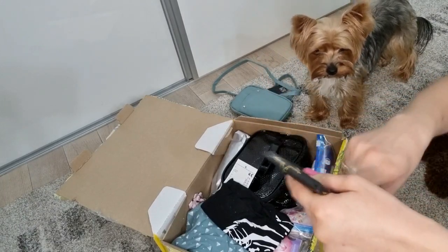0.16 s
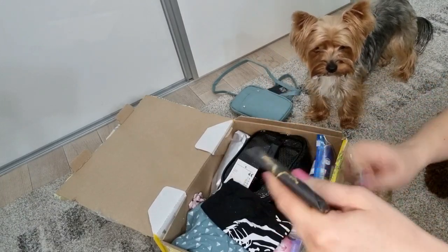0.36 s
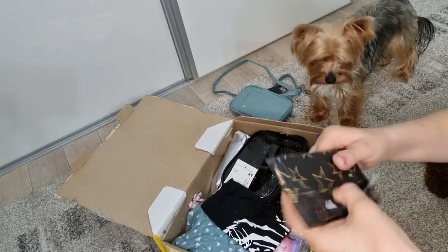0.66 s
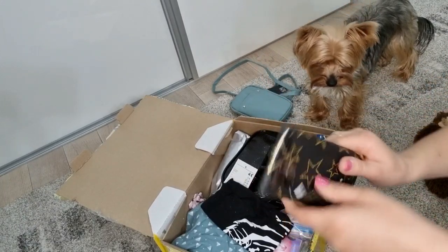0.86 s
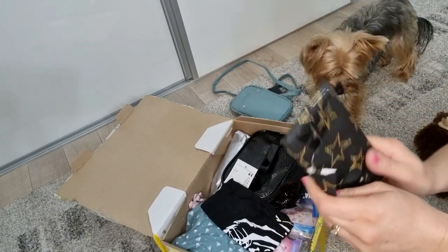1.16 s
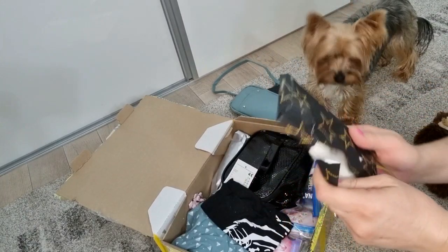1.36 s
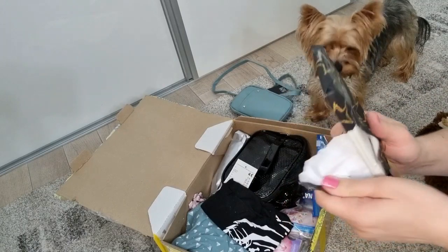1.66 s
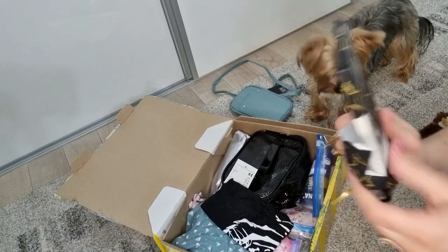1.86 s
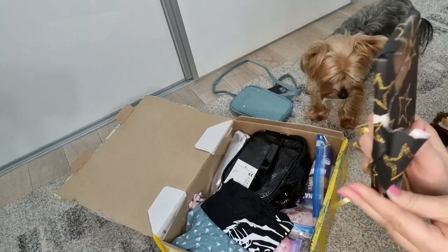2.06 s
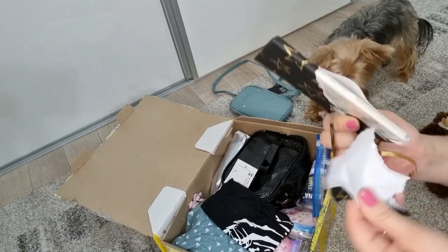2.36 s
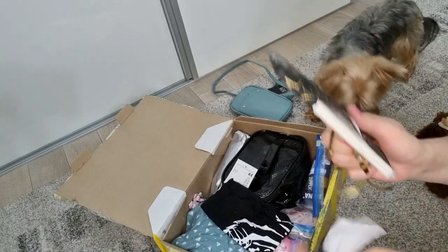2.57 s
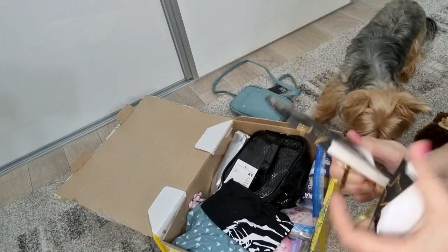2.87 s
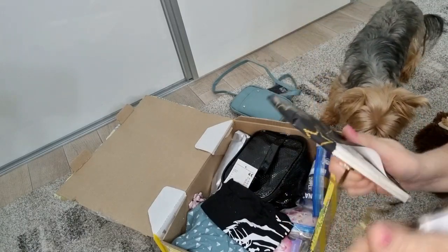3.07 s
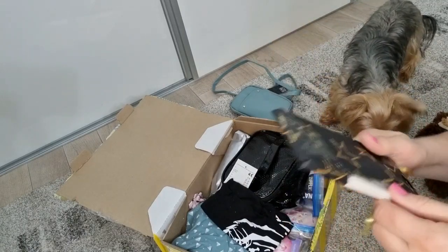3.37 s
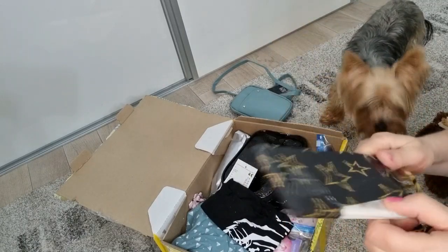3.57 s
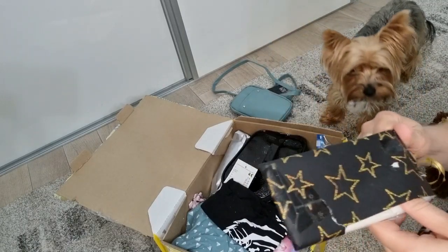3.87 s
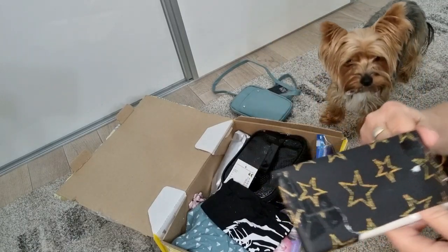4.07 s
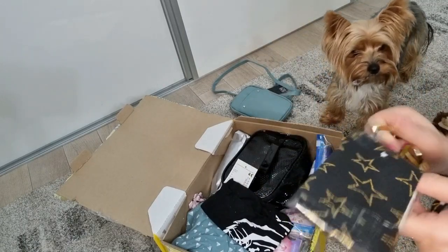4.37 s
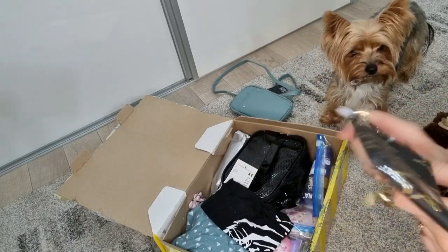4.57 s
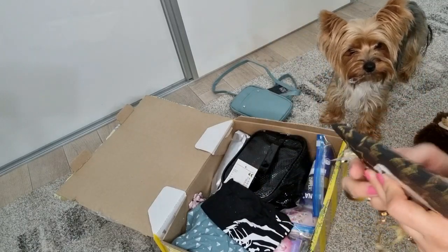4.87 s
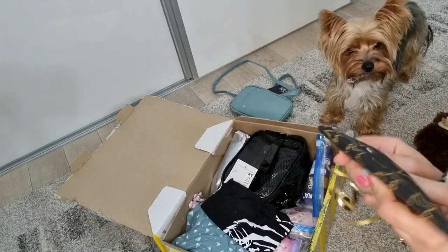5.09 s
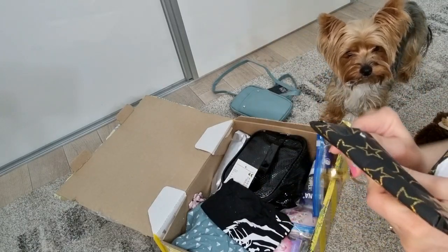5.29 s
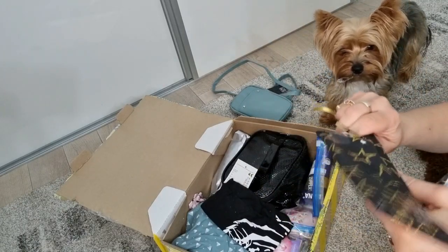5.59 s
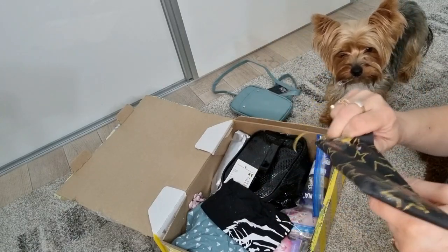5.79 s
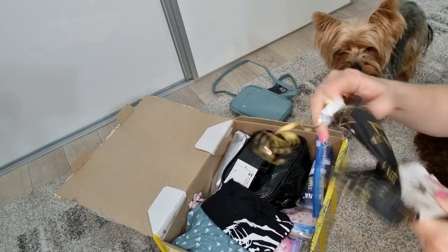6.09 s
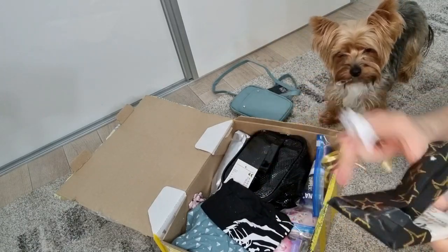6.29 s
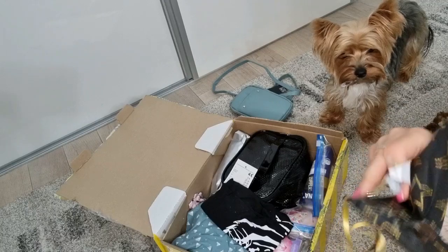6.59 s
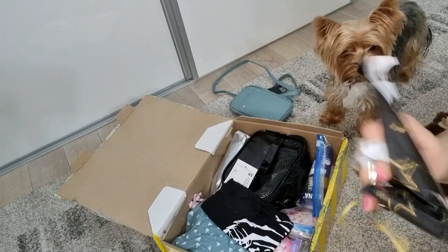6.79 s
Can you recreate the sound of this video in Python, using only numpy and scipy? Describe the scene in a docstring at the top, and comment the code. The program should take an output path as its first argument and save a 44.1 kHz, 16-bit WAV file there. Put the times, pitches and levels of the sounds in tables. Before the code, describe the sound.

Close to a stereo microphone, hands work stiff gift paper off a small parcel in a small carpeted room. Brisk crackles open, then sparse rustles, a busy run of snapping creases and short rips around two seconds, and lighter crinkling through the middle. Near six seconds one abrupt, bright rip stands out loudest, followed by faint rustle and a final crackling tear. A few dull knocks sit underneath.

```python
"""Stiff gift paper slides and rips in strokes as hands pull it off a small parcel, close to a camera.
Strokes are noise of tiny random fibre breaks, shaped into a hiss and a lower flutter of the sheet.
Creases buckle with sharp snaps: noise bursts with a facet ring, a sheet pop and a crisp edge.
The parcel knocks dully against the fingers, each knock a damped sine at its own pitch; a small
carpeted room answers with decaying noise echoes over a faint steady hush."""
import sys
import numpy as np
from scipy import signal
from scipy.fft import rfft, irfft, next_fast_len
from scipy.io import wavfile
from scipy.ndimage import uniform_filter1d, minimum_filter1d

SR = 44100
rng = np.random.default_rng(int(sys.argv[2]) if len(sys.argv) > 2 else 0)


def store_wav(level_fs):
    """Save 16-bit WAV to argv[1]."""
    pcm = np.round(np.clip(np.atleast_2d(level_fs), -1, 1) * 32767)
    wavfile.write(sys.argv[1], SR, pcm.T.astype(np.int16))


N = 306274


def amp(db):
    """Decibels to gain."""
    return 10 ** (np.asarray(db) / 20)


def unit(x):
    """Scale to rms 1."""
    return x / np.sqrt(np.mean(x ** 2) + 1e-20)


def along(points, hz):
    """Interpolate (Hz, value) points on a log frequency axis."""
    point_hz, value = np.transpose(points)
    return np.interp(np.log(hz + 1), np.log(point_hz + 1), value)


def filtered(x, response):
    """Multiply the spectrum of x by a complex response of frequency."""
    size = next_fast_len(N + SR // 2)
    hz = np.fft.rfftfreq(size, 1 / SR)
    return irfft(rfft(x, size) * response(hz), size)[..., :N]


def coloured(x, spectrum):
    """Filter x by a table of gains in dB, then scale to rms 1."""
    return unit(filtered(x, lambda hz: amp(along(spectrum, hz))))


def band(x, low_hz, high_hz, order):
    """Causal Butterworth band-pass."""
    edges_hz = np.sort(np.clip([low_hz, high_hz], 20, SR / 2 - 100))
    b, a = signal.butter(order, edges_hz, "band", fs=SR)
    return signal.lfilter(b, a, x)


def pair(shape, apart):
    """Random values for two microphones: a shared part plus an independent part scaled by apart."""
    return rng.standard_normal(shape) + apart * rng.standard_normal((2, *shape))


def hush():
    """Steady room noise, partly shared by the two microphones, at rms 1."""
    # hz, density_db (per Hz, relative)
    ambient_spectrum = [(20, -2), (60, -3.5), (200, 5), (400, 1), (1200, -24), (4000, -2.5), (16000, -26)]
    return coloured(pair((N,), apart=0.53), ambient_spectrum)


def room(x):
    """Stereo echoes off the walls: a fresh decaying noise tail every 1/8 s, as the hands move."""
    # hz, t60_s
    decay_times = [(300, 0.29), (1000, 0.23), (5000, 0.19), (14000, 0.13)]
    buildup_s = 0.00033
    hop = SR // 8
    out = np.zeros((2, N + 2 * SR))
    x = np.pad(x, (hop, 2 * hop))
    window = np.sin(np.linspace(0, np.pi, 2 * hop))
    for start in range(0, N + hop, hop):
        hz, age_s, z = signal.stft(rng.standard_normal((2, SR // 2)), SR, nperseg=256)
        decay = amp(-60 * age_s / along(decay_times, hz)[:, None])
        tail = signal.istft(z * decay, SR, nperseg=256)[1]
        tail *= 1 - np.exp(-np.arange(tail.shape[1]) / SR / buildup_s)
        piece = x[start:start + 2 * hop] * window
        echo = signal.fftconvolve(piece[None], tail / np.linalg.norm(tail[0]), axes=1)
        out[:, start:start + echo.shape[1]] += echo
    return out[:, hop:hop + N]


def close_pair(x):
    """Long waves reach two neighbouring microphones alike: the difference fades below apart_hz."""
    apart_hz = 400
    mid = x.mean(axis=0)
    return mid + filtered(x - mid, lambda hz: hz / np.hypot(hz, apart_hz))


def direct(x):
    """Paper nearer the left microphone: earlier there, and louder at most frequencies."""
    # hz, left_minus_right_db
    level_excess = [(500, 1), (1000, -1), (2500, 5), (10000, 2.5)]
    # left lead over the right microphone, by frequency: hz, left_lead_rad
    phase_lead = [(0, 0), (520, .4), (1810, 4.5), (4910, 7.2), (6600, 12), (11300, 18), (16000, 22.5)]
    side = np.array([[1], [-1]]) / 2

    def response(hz):
        lead_rad = np.interp(hz, *np.transpose(phase_lead))
        return amp(side * along(level_excess, hz)) * np.exp(1j * side * lead_rad)

    return filtered(x, response)


def parcel_turn():
    """Slow left/right gains as the parcel turns in the hands."""
    # time_s, left_minus_right_db
    turning = [(2.3, -0.3), (3.7, 2.5), (5.7, -1), (6.2, 0.4)]
    balance_db = np.interp(np.arange(N) / SR, *np.transpose(turning))
    return amp(np.array([[.5], [-.5]]) * balance_db)


def knocks():
    """Soft blows, each one heavily damped sine at its own pitch, with its lows filtered off."""
    # start_s, peak_db, pitch_hz
    knock_rows = [(0.176, -47, 330), (0.237, -54, 240), (1.587, -47, 172), (1.73, -54, 150),
                  (1.992, -34.5, 600), (2.26, -51, 190), (2.783, -32, 480), (3.587, -56, 230),
                  (3.722, -50, 400), (6.651, -45, 268), (6.86, -42, 272)]
    t60_s = .009
    t = np.arange(SR // 6) / SR
    out = np.zeros(N + SR)
    for start_s, peak_db, pitch_hz in knock_rows:
        sine = amp(-60 * t / t60_s) * np.sin(2 * np.pi * pitch_hz * t)
        ring = band(sine, pitch_hz / 2, SR / 4, order=2)
        out[round(start_s * SR):][:len(t)] += amp(peak_db) * ring / np.abs(ring).max()
    return out[:N]


def handling(t):
    """Hiss, flutter, treble (dB) and ring (Hz) at times t, from strokes that attack, ease and let go."""
    # pulls and jerks; taut paper has more treble; ring is of the stretched span:
    # start_s (at full strength), attack_s (per 20 dB), hold_s, hiss_db, flutter_db, treble_db, ring_hz
    stroke_rows = [(0.058, .015, 0.012, -42, -54, -10, 2200), (0.1, .04, .06, -55, -60, -7, 5000),
                   (0.174, .016, .06, -41, -40, -1.5, 2200), (0.47, .08, .17, -61.5, -70.5, -4, 4700),
                   (0.681, .04, .14, -63.5, -67.5, 3, 5400), (1.115, .02, .17, -47, -55, 1, 3000),
                   (1.375, .04, .07, -46, -55, -2, 3100), (1.465, .025, .11, -39.5, -46, -2, 3300),
                   (1.722, .04, .015, -45, -56, 1, 4300), (1.993, .016, 0.012, -43, -43, -10, 2000),
                   (2.138, .012, 0.06, -43, -52, -4, 3100), (2.208, .03, .025, -34, -40, -2, 3200),
                   (2.462, .02, 0.09, -58, -66, 4, 4400), (2.59, .04, .07, -56, -65, 3, 5500),
                   (2.695, .03, .115, -55, -58, -7, 3000), (2.883, .04, 0.17, -66, -70.5, 0.5, 3000),
                   (3.305, .02, 0.17, -60, -74.5, 2, 3000), (3.567, .02, 0.013, -57, -59, -10, 2800),
                   (3.637, .02, 0.024, -50, -61, 0, 3400), (3.725, .01, .06, -55.5, -65, 2, 5000),
                   (4.209, .015, .01, -47, -57, -4, 4000), (4.282, .02, .03, -49.5, -75, 0, 4400),
                   (4.426, .02, 0.01, -60, -87, 8, 7600), (4.53, .06, .035, -56, -66, -5.5, 2900),
                   (4.825, .06, .045, -55, -63, -9, 3300), (4.932, .012, 0.035, -42, -52, -6, 2200),
                   (5.158, .012, 0.041, -47, -58, -11, 2400), (5.315, .06, .1, -51.5, -68.5, 1, 2400),
                   (5.582, .01, 0.034, -59.5, -57.5, -6, 4800), (5.682, .04, .02, -41.5, -63, 5, 7400),
                   (5.861, .027, .033, -22.5, -33.5, -.5, 5000), (6.03, .04, .14, -55, -60.5, -1, 5100),
                   (6.228, .015, .1, -52.5, -63, 3.5, 3300), (6.41, .05, .17, -52, -72, 2, 6700),
                   (6.615, .05, 0.19, -43, -53, 1, 3200), (6.823, .02, .11, -33, -40.5, -1, 3400)]
    ease_db, release_s = 3, .06  # fall over the hold; release per 20 dB
    held_hiss_db, held_flutter_db = -71.5, -73.5  # rustle of paper merely held
    columns = np.transpose(stroke_rows)[..., None]
    start_s, attack_s, hold_s, hiss_db, flutter_db, treble_db, ring_hz = columns
    age_s = t - start_s
    attack_db = 20 * np.minimum(age_s, 0) / attack_s
    easing_db = ease_db * (np.clip(age_s / hold_s, 0, 1) - .5)
    release_db = 20 * np.maximum(age_s - hold_s, 0) / release_s
    power = amp(np.maximum(attack_db - easing_db - release_db, -120)) ** 2
    hiss = power * amp(hiss_db) ** 2
    flutter = power * amp(flutter_db) ** 2
    all_hiss = hiss.sum(axis=0) + amp(held_hiss_db) ** 2
    all_flutter = flutter.sum(axis=0) + amp(held_flutter_db) ** 2
    # treble and ring: averages weighted by hiss power
    mean_treble_db = (hiss * treble_db).sum(axis=0) / all_hiss
    mean_ring_hz = (hiss * ring_hz).sum(axis=0) / hiss.sum(axis=0)
    return 10 * np.log10(all_hiss), 10 * np.log10(all_flutter), mean_treble_db, mean_ring_hz


def snaps(rows):
    """A crease flips: a broad crack, the ring of its facet, a pop of the sheet and a crisp edge."""
    strain_s, strain_db = .005, -31  # faint creak just before the flip
    base_flip_s, slowing, facet_q = .0038, .2, 4  # decay per 60 dB; dB of duration per dB of pop; ring Q
    s, db, ring_hz, pop_db, edge_db = np.transpose(rows)[..., None]
    t = np.arange(SR // 30) / SR

    def each(x):
        """Scale each snap to energy 1, averaged over the microphones."""
        return x / np.sqrt(np.sum(x ** 2, axis=-1, keepdims=True).mean(axis=0))

    # more pop, slower flip; small slips follow
    flip_s = base_flip_s * amp(slowing * np.maximum(pop_db + 36, 0))
    age_s = np.maximum(t - strain_s, 0)
    slips = .08 * amp(-60 * age_s / .025)
    shape = (amp(-60 * age_s / flip_s) + slips) * (1 - np.exp(-age_s / .0006))
    shape += amp(strain_db) * (t / strain_s) * (t < strain_s)
    crack_noise, ring_noise, pop_edge_noise = (pair((len(s), len(t)), apart=.55) * shape for _ in range(3))
    hz = np.fft.rfftfreq(len(t), 1 / SR) + 1
    facet = 1 / (1 + 1j * facet_q * (hz / ring_hz - ring_hz / hz))
    ring = each(irfft(rfft(ring_noise) * facet, len(t)))
    core = each(each(band(crack_noise, 1970, 7340, order=4)) + 1.1 * ring)
    pop = amp(pop_db + 11) * each(band(pop_edge_noise, 367, 3180, order=3))
    edge = amp(edge_db + 2.5) * each(band(pop_edge_noise, 6400, 17100, order=2))
    sound = amp(db + 8.6) * each(core + pop + edge)
    first = np.round(np.maximum(s - strain_s, 0) * SR).astype(int)
    where = first + np.arange(len(t))
    return np.array([np.bincount(where.ravel(), ear.ravel(), N)[:N] for ear in sound])


def crinkles(count):
    """Small random snaps: the harder the stroke, the denser and louder they are."""
    crowding, growth = .25, .62  # dB of density, and of level, per dB of hiss
    level_db, spread_db = -9, 4.8
    t = np.arange(0, N, 40) / SR
    tally = np.cumsum(amp(crowding * handling(t)[0]))
    when_s = np.interp(rng.random(count), tally / tally[-1], t)
    hiss_db, _, treble_db, span_hz = handling(when_s)
    size, pitch, pop, edge = np.clip(rng.standard_normal((count, 4)), -2, 1.8).T
    db = level_db + growth * hiss_db + spread_db * size
    ring_hz = span_hz * np.exp(.38 * pitch)
    pop_db = -30.5 + 4 * pop
    edge_db = -23 + treble_db + 4 * edge
    return snaps(np.transpose([when_s, db, ring_hz, pop_db, edge_db]))


def creases():
    """Larger creases buckle at set times, each with its own ring, pop and edge."""
    # flip_s, strength_db, ring_hz, pop_db, edge_db (relative levels; snaps() adds fixed lifts)
    crease_rows = [(0.0570, -15, 2050, -31, -40), (0.1308, -23, 4650, -32, -24),
                   (0.1712, -12.5, 6200, -19, -15), (0.1752, -11, 2750, -18, -18),
                   (0.5495, -33, 3190, -32, -10), (0.609, -27.5, 3000, -20.5, -17),
                   (0.7049, -30, 5100, -32, -14), (1.1002, -26, 7700, -27, -6),
                   (1.1237, -22, 3024, -35, -3), (1.1432, -22, 3100, -19, -14),
                   (1.1547, -21, 3206, -24, -13), (1.2158, -22, 6000, -35, -5),
                   (1.2499, -19.5, 6000, -30, -5), (1.2876, -23, 5100, -33, -25),
                   (1.454, -22, 2580, -26, -20), (1.529, -19, 3390, -29.5, -10),
                   (1.5616, -20, 3190, -33, -15), (1.588, -12, 3150, -21, -9),
                   (1.9016, -35, 3250, -36, -22), (1.9914, -15, 2600, -23, -17),
                   (2.109, -28, 1380, -12, -25), (2.1346, -12, 4400, -32, -10),
                   (2.1716, -9.5, 3060, -33, -17), (2.464, -29, 7280, -22, -3),
                   (2.6907, -20.5, 1900, -16, -30), (2.7271, -27, 3150, -26, -30),
                   (2.7832, -13.5, 3400, -23, -13), (3.0056, -25.5, 3040, -22, -28),
                   (3.3146, -33, 3000, -28, 1), (3.4244, -30, 3100, -22, -14), (3.6355, -27, 7190, -30, -8),
                   (3.6519, -23.5, 3400, -36, -4), (3.6606, -16.5, 3600, -38, -11),
                   (3.7218, -20, 3240, -25, -21), (3.7347, -25, 4900, -30, -10),
                   (3.8187, -25.5, 6700, -32, -8), (3.8418, -27, 2600, -38, -18),
                   (4.0907, -19, 3350, -38, -36), (4.181, -36, 6500, -38, -12),
                   (4.2074, -16, 3420, -29, -27), (4.4246, -29, 7700, -36, 3),
                   (4.4997, -33.5, 2900, -25, -23), (4.8604, -26, 4700, -24, -30),
                   (4.9276, -22.5, 4400, -38, -7), (4.9363, -20.5, 2580, -28, -18),
                   (4.9538, -16, 3100, -28, -28), (5.1559, -24, 3100, -28, -25),
                   (5.4827, -24, 6300, -32, -6), (5.5095, -18.5, 6250, -42, -16),
                   (5.5146, -20.5, 7000, -36, -14), (5.5794, -27, 5200, -33, -25),
                   (5.8678, -3.5, 7000, -20, -6), (5.8772, -8, 5200, -32, -14), (5.884, -3, 5200, -24, -13),
                   (6.1399, -32, 4870, -19, -13), (6.2292, -28, 3350, -21, -10),
                   (6.451, -20.5, 3300, -28, -12), (6.4552, -18, 3450, -17, -11),
                   (6.6263, -19.5, 3150, -22, -15), (6.7354, -21, 5200, -30, -18),
                   (6.7778, -12.5, 4800, -34, -20), (6.8168, -11.5, 5200, -24, -10),
                   (6.828, -6, 7500, -24, -8), (6.8705, -5.5, 3550, -26, -26),
                   (6.8896, -10.5, 5500, -24, -10)]
    return snaps(crease_rows)


def grains(per_second, spread_db, smooth):
    """Random tiny breaks of uneven size over a smooth sliding noise; each radiates its own way."""
    sizes = amp(spread_db * np.clip(rng.standard_normal(N), -2, 2))
    breaks = sizes * (rng.random(N) < per_second / SR)
    return (unit(breaks) + smooth) * pair((N,), apart=1.0)


def flexing(x, depth_db):
    """The bending sheet favours ever-changing patches of frequency; depth is rms."""
    z = signal.stft(x, nperseg=512)[2]
    field = uniform_filter1d(rng.standard_normal(z.shape[1:]), size=4, axis=0)
    field = uniform_filter1d(field, size=7, axis=1)
    return signal.istft(z * amp(depth_db * unit(field)), nperseg=512)[1][:, :N]


def stretched(x, ring_hz):
    """The span of paper between the fingers resonates; its pitch wanders as the grip shifts."""
    peak_db, q, wander = -2, 4, .08  # added resonance; sharpness; rms relative drift
    hz, frame_s, z = signal.stft(x, SR, nperseg=512)
    drift = unit(uniform_filter1d(rng.standard_normal(len(frame_s)), size=9))
    centre_hz = np.interp(frame_s, np.arange(N) / SR, ring_hz) * np.exp(wander * drift)
    ratio = (hz[:, None] + 1) / centre_hz
    gain = 1 + amp(peak_db) / (1 + (q * (ratio - 1 / ratio)) ** 2)
    return unit(signal.istft(z * gain, nperseg=512)[1][:, :N])


def strokes():
    """Fibres slip and break in a hiss while the loose sheet flutters below it."""
    # both: hz, density_db (per Hz, relative)
    fibre_spectrum = [(180, -69), (950, -21), (1900, -8), (3200, -3.5), (7600, -3.8), (9000, -16.5),
                      (11000, -17), (13000, -11.5), (16000, -14)]
    flutter_spectrum = [(30, -34), (70, -38), (130, -12), (230, -2.5), (500, 3), (900, 9), (1900, 7.5),
                        (3500, -7.5)]
    t = np.arange(N) / SR
    coarse = t[::40]
    controls = [np.interp(t, coarse, control) for control in handling(coarse)]
    hiss_db, flutter_db, treble_db, ring_hz = controls
    fibres = flexing(grains(per_second=1800, spread_db=4.5, smooth=.3), depth_db=2.8)
    hiss = stretched(coloured(fibres, fibre_spectrum), ring_hz)
    treble = filtered(hiss, lambda hz: np.clip((hz - 4500) / 3000, 0, 1))
    bright = amp(treble_db)
    # the divisor offsets the level change from the treble gain
    hiss = (hiss + (bright - 1) * treble) / np.sqrt(0.53 + 0.074 * bright ** 2)
    sheet = flexing(grains(per_second=950, spread_db=2.5, smooth=0.8), depth_db=4.0)
    flutter = coloured(sheet, flutter_spectrum)
    # paper catches and lets go: breaks come in clumps
    catch = amp(1.05 * unit(uniform_filter1d(rng.standard_normal(N), size=300)))
    return catch * (hiss * amp(hiss_db) + flutter * amp(flutter_db))


def scene():
    """Paper and parcel, direct and echoed by the room, over its faint steady hush."""
    paper = strokes() + creases() + crinkles(count=450)
    thuds = knocks()
    near = parcel_turn() * direct(paper + thuds)
    echoes = close_pair(room(paper.mean(axis=0) + amp(-3) * thuds))
    return near + amp(-3.0) * echoes + amp(-70.5) * hush()


def record(dry):
    """The camera's limiter ducks peaks above -4 dB; a steep low-pass then cuts the top."""
    top_hz = 15900
    needed = np.minimum(1, amp(-4) / (np.abs(dry).max(axis=0) + 1e-9))
    gain = uniform_filter1d(minimum_filter1d(needed, size=180), size=180)
    return filtered(dry * gain, lambda hz: hz < top_hz)


dry = scene()
out = record(dry)
store_wav(out)
```